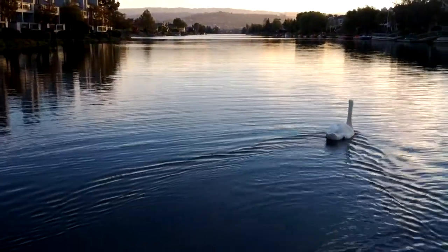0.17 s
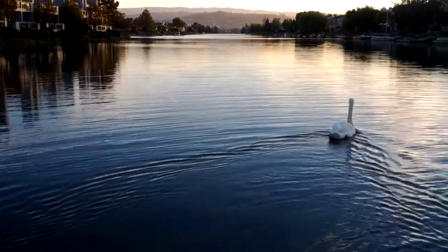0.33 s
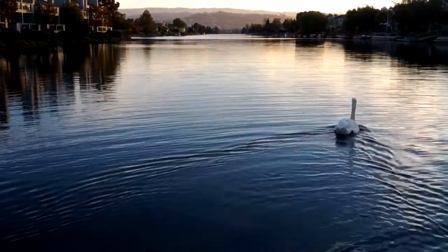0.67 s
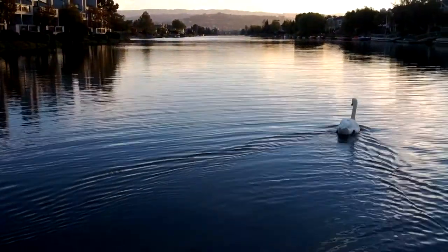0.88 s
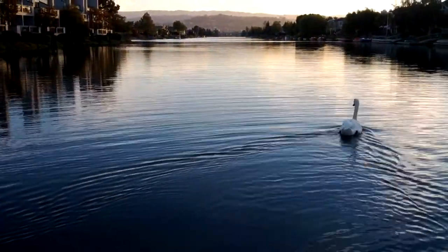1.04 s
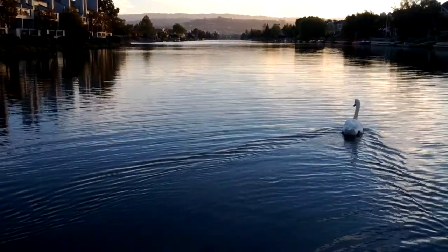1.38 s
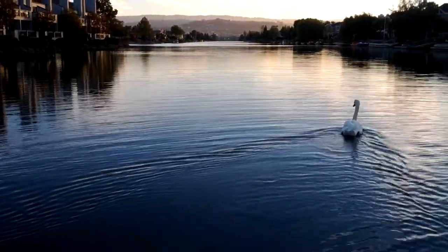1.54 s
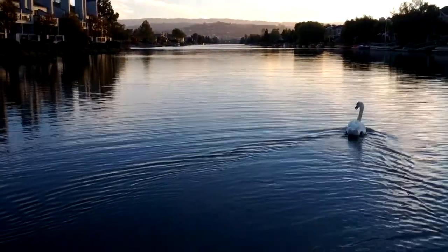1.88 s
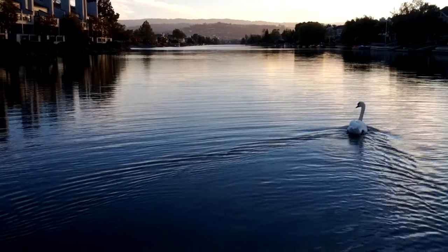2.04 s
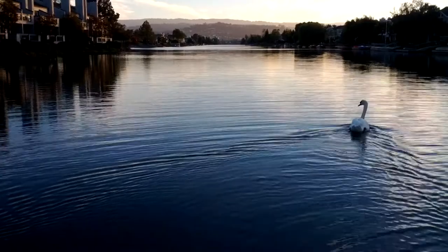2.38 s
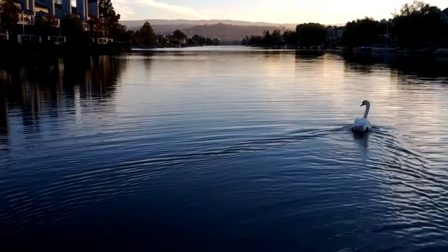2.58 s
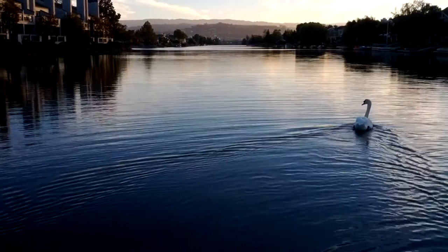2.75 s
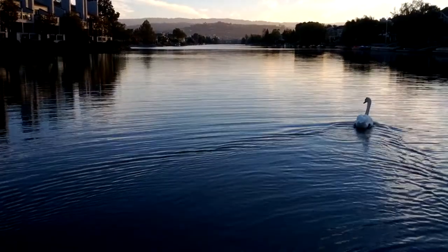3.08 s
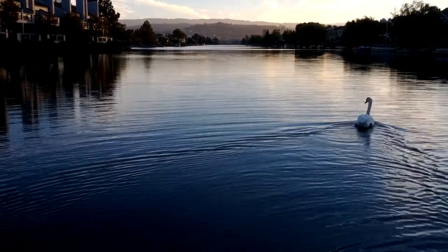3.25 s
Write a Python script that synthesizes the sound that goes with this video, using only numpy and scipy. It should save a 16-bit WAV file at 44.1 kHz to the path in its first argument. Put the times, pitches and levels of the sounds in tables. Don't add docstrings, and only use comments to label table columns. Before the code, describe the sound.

One brief raspy swan grunt over quiet distant town rumble and sparse sparrow chirps.

```python
import sys
import numpy as np
from scipy import signal
from scipy.fft import rfft, irfft
from scipy.io import wavfile
from scipy.ndimage import uniform_filter1d

SR = 44100
rng = np.random.default_rng(int(sys.argv[2]) if len(sys.argv) > 2 else 0)


def put_to_file(sound):
    columns = np.atleast_2d(sound).T
    safe = np.clip(columns, -1, 1)
    whole_steps = np.round(safe * 32767)
    wavfile.write(sys.argv[1], SR, whole_steps.astype(np.int16))


def volts(x):
    e = np.asarray(x, float) / 20
    return 10 ** e


N = 150822


def level(x, db):
    return x * volts(db) / np.sqrt(np.mean(x ** 2))


def band(x, hz, width_hz):
    low_hz = max(hz - width_hz / 2, hz / 4)
    sos = signal.butter(2, [low_hz, low_hz + width_hz], "band", fs=SR, output="sos")
    return signal.sosfilt(sos, x)


def band_noise(hz, width_hz, db):
    return level(band(rng.standard_normal(N), hz, width_hz), db)


def walk(rate_hz):
    hold = int(SR / rate_hz)
    steps = np.repeat(rng.standard_normal(N // hold + 1), hold)
    return 1.35 * uniform_filter1d(uniform_filter1d(steps, hold), hold)[:N]


def coloured(spectrum, db, swell_db, flicker_db):
    f = np.maximum(np.arange(N // 2 + 1) * SR / N, 1)
    hz, db_per_hz = np.array(spectrum).T
    gain = volts(np.interp(np.log(f), np.log(hz), db_per_hz, left=-120))
    shaped = gain * rfft(rng.standard_normal(N))
    out, swell = 0, walk(0.68)
    for octave in range(4, 15):
        window = np.cos(np.pi / 2 * np.clip(np.log2(f) - octave, -1, 1)) ** 2
        out = out + irfft(shaped * window, N) * volts(swell_db * swell + flicker_db * walk(5.95))
    return level(out, db)


def bell(t, at_s, span_s):
    return np.exp(-((t - at_s) / span_s) ** 2)


def town(t):
    # frequency_hz, density_db (per Hz)
    rumble = [(12, -37), (20, -4.5), (48, 0.5), (125, -1.5), (200, -10), (368, -16), (576, -23), (958, -22),
              (2600, -37.5), (3380, -50), (5720, -120)]
    drone = band_noise(53.5, 12.6, -54)
    car = band_noise(302, 247, -57.5) * bell(t, 1.86, 0.31)
    second_car = band_noise(202, 160, -54) * bell(t, 1.52, 0.084)
    wind = band_noise(35, 25, -46) * bell(t, 1.96, 0.07)
    return coloured(rumble, -47, .5, 0.84) + drone + car + second_car + wind


def microphone():
    # frequency_hz, density_db (per Hz)
    self_noise = [(1060, -37), (1800, -7), (2280, -7.5), (3450, -4), (4560, -4.5), (14900, -9.5),
                  (15600, -11.5)]
    return coloured(self_noise, -65, 0.14, 0.14) + band_noise(9900, 2200, -78) - 0.00081


def sparrows(t):
    # time_s, pitch_hz, level_db
    arches = [
        [(.953, 3720, -72), (.966, 3780, -66), (.978, 4120, -59.5), (.99, 3720, -61)],
        [(.955, 3300, -72), (.975, 3400, -69), (.988, 3150, -65), (.998, 3050, -72)],
        [(1.262, 4050, -72), (1.274, 4050, -61), (1.282, 4970, -59), (1.304, 3850, -66)],
        [(2.706, 3460, -69), (2.72, 3570, -66), (2.731, 3700, -61.5), (2.742, 3470, -67)],
        [(2.724, 3950, -72), (2.731, 4250, -65), (2.742, 4000, -68)],
        [(3.178, 3800, -70), (3.195, 3730, -68), (3.213, 3800, -60), (3.226, 4200, -57), (3.236, 4310, -56),
         (3.257, 3600, -66)],
        [(3.18, 4200, -66), (3.2, 4000, -62), (3.225, 4330, -59)],
    ]
    # start_s, length_s, from_hz, to_hz, level_db
    chips = [(.655, .006, 5550, 5450, -72), (.668, .012, 5500, 5400, -70), (.696, .013, 5600, 5200, -69),
             (1.012, .011, 3700, 4200, -60), (1.024, .014, 4450, 4000, -68), (1.024, .012, 4650, 4750, -67),
             (2.748, 0.015, 3000, 2950, -68), (2.097, 0.053, 1980, 1970, -69),
             (2.318, .04, 1280, 1330, -69), (2.77, .014, 4200, 4280, -66), (2.772, .011, 4780, 4700, -68),
             (3.052, .02, 6040, 5500, -70), (3.097, .01, 5900, 5730, -68)]
    notes = arches + [[(start, a, db), (start + length, b, db)] for start, length, a, b, db in chips]
    out, shake = 0, walk(150)
    for note in notes:
        s, hz, db = np.array(note).T
        glide = uniform_filter1d(np.interp(t, s, hz), size=90)
        phase = 2 * np.pi * np.cumsum(glide * (1 + 0.0019 * shake)) / SR
        soft_ends = np.clip(np.minimum(t - s[0], s[-1] - t) / 0.0033 + 0.33, 0, 1) ** 2
        loudness = np.sqrt(2) * volts(np.interp(t, s, db) + 1.06 * shake)
        out = out + loudness * soft_ends * np.sin(phase)
    return out


def tick(t):
    start_s, ring_hz, decay_s = 1.0609, 8500, .0011
    u = np.maximum(t - start_s, 0)
    impulse = 1. * (np.arange(N) == int(start_s * SR))
    ring = np.exp(-u / decay_s) * np.sin(2 * np.pi * ring_hz * u)
    return volts(-36.5) * band(impulse, 8400, 10200) + volts(-49.5) * ring


def nostrils(t):
    # start_s, length_s, centre_hz, width_hz, level_db
    jets = [
        (1.815, .045, 6100, 1500, -67),
        (1.81, .06, 8900, 2000, -68.5),
        (1.93, .05, 9300, 1500, -71),
        (1.982, .022, 9000, 2000, -67),
        (2.01, .028, 8500, 700, -64.5),
        (2.012, 0.063, 9800, 1000, -70),
        (2.045, 0.019, 8400, 600, -69),
        (1.93, 0.15, 4700, 3800, -67.5),
        (1.87, 0.19, 1550, 2200, -65),
    ]
    flutter = volts(2.4 * walk(170))
    out = 0
    for start, length, hz, width_hz, db in jets:
        out = out + band_noise(hz, width_hz, db) * flutter * bell(t, start + length / 2, length / 2)
    return out


def grunt():
    # frequency_hz, t60_s, peak_db, strongest_at_s, fades_6_db_within_s (roughly)
    pipe = [(390, .03, -52, 1.95, .1), (1030, .035, -45, 1.928, .038), (1300, .01, -48, 1.92, .06),
            (1650, .01, -50, 1.95, .05), (1975, .04, -42, 1.915, .058), (2280, .013, -45.5, 1.93, .06),
            (2770, .016, -44.5, 1.974, .017), (2620, .012, -48, 1.95, .05), (3150, .01, -51, 1.955, .04),
            (3570, .015, -47, 1.935, .045), (4100, .01, -52, 1.96, .03), (4680, .013, -50, 1.925, .055),
            (5400, .01, -52, 1.955, .03)]
    # time_s, push_db, lowest_resonance_hz
    effort = [
        (1.865, -5, 860),
        (1.887, 0, 905),
        (1.91, -1, 830),
        (1.95, -1, 830),
        (1.974, 0, 885),
        (2.002, -2, 815),
        (2.028, -8, 770),
    ]
    start_s, period_s, slowing_s = 1.8652, .0207, .0004
    open_s, close_s, puff_s = .008, .0015, 0.0056
    rise_s, lag_s_per_khz = .0009, .0005
    k = np.arange(8)
    flaps = start_s + period_s * k + slowing_s * k * (k - 1) / 2
    flaps = flaps + .0055 * (k == 6) + .006 * (k > 6)
    s, push_db, lowest_hz = np.array(effort).T
    u = np.arange(900) / SR
    out = np.zeros(N)
    for at in flaps:
        effort_db = np.interp(at, s, push_db)
        modes = pipe + [(np.interp(at, s, lowest_hz), .08, -42.5, at, 1)]
        push = volts(-12) * 0.22 * rng.standard_normal(len(u)) * np.exp(-u / puff_s)
        push[0] = 1
        ring = 0
        for hz, t60, db, best, span in modes:
            vary_db, vary_hz = rng.standard_normal(2) * (0.47, 0.016)
            v = np.maximum(u - lag_s_per_khz * (hz / 1000 - 1), 0)
            size = volts(db + effort_db - 4.8 * ((at - best) / span) ** 2 + vary_db)
            envelope = (1 - np.exp(-v / rise_s)) * np.exp(-v * np.log(1000) / t60)
            ring = ring + size * envelope * np.sin(2 * np.pi * hz * (1 + vary_hz) * v)
        gate = np.exp(-np.maximum(u - open_s * volts(effort_db), 0) / close_s)
        i = int(at * SR)
        out[i:i + len(u)] += np.convolve(push, ring)[:len(u)] * gate
    return out


def banks(voice):
    # delay_s, level_db, centre_hz, width_hz
    shores = [
        (.21, -22, 1970, 500),
        (.41, -20, 1000, 600),
    ]
    u = np.arange(12000) / SR
    smear = rng.standard_normal(len(u)) * np.exp(-u / .012) / 16
    decay = np.exp(-u * np.log(1000) / .3)
    tail = level(rng.standard_normal(len(u)) * decay, -14) / np.sqrt(len(u))
    smeared = signal.fftconvolve(voice, smear)[:N]
    out = signal.fftconvolve(voice, tail)[:N]
    for delay, db, hz, width_hz in shores:
        out = out + volts(db) * np.roll(band(smeared, hz, width_hz), int(delay * SR))
    return out


def scene():
    t = np.arange(N) / SR
    voice = grunt()
    return (town(t) + sparrows(t) + tick(t) + nostrils(t) + voice + banks(voice))[None]


def top_cut(x):
    return signal.sosfilt(signal.butter(12, 15740, fs=SR, output="sos"), x)


def record(dry):
    return top_cut(dry + microphone())


dry = scene()
out = record(dry)
put_to_file(out)
```